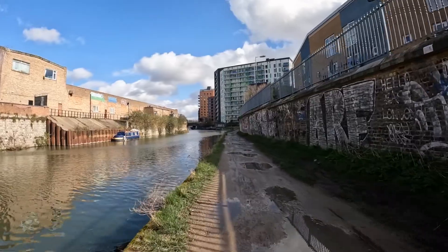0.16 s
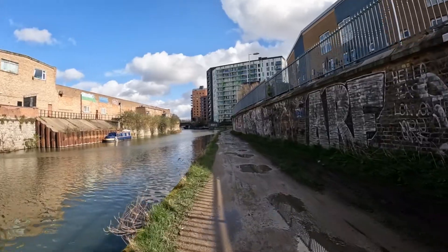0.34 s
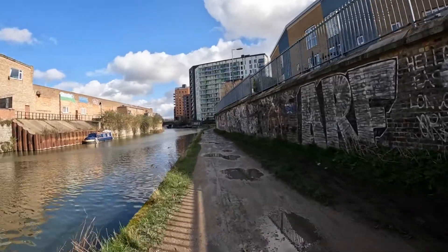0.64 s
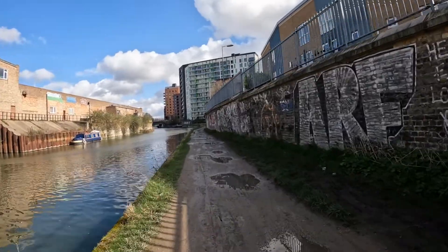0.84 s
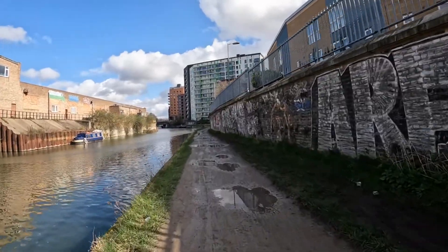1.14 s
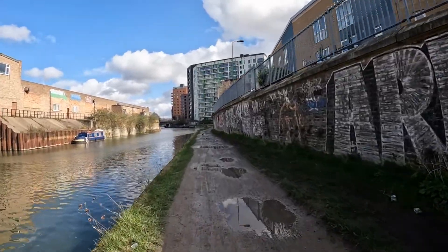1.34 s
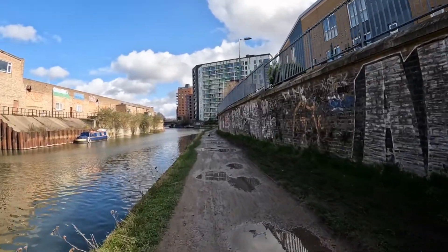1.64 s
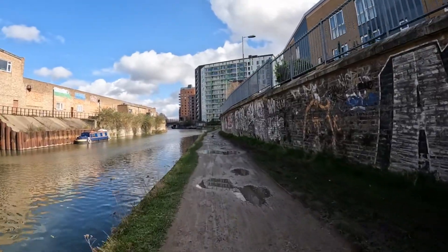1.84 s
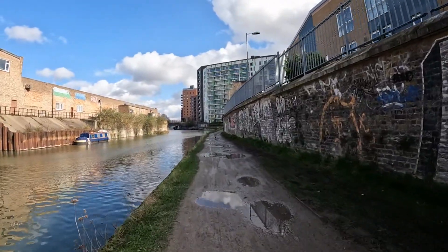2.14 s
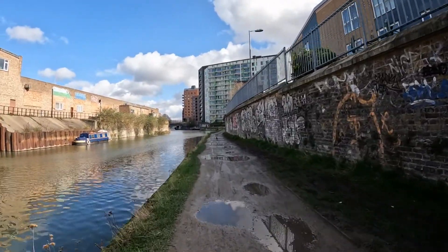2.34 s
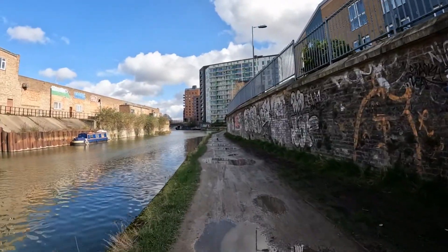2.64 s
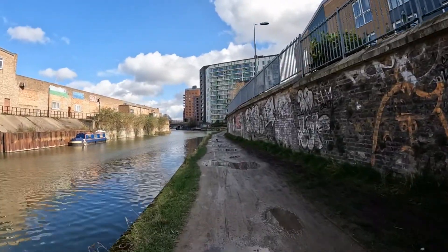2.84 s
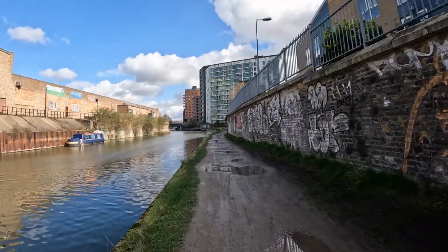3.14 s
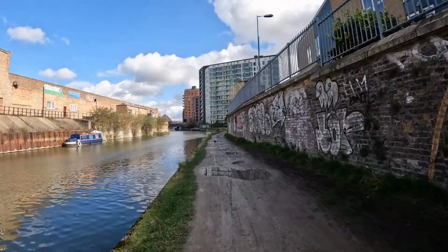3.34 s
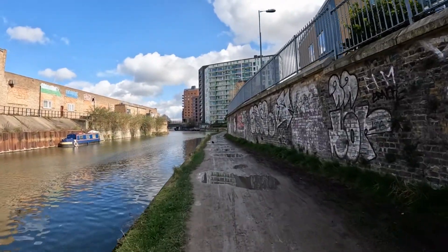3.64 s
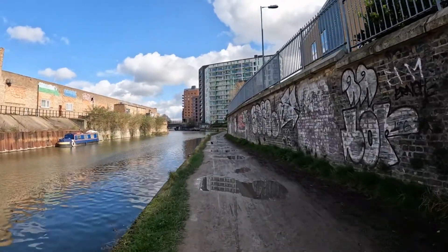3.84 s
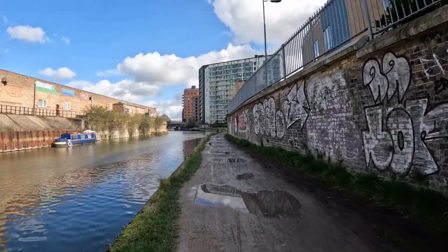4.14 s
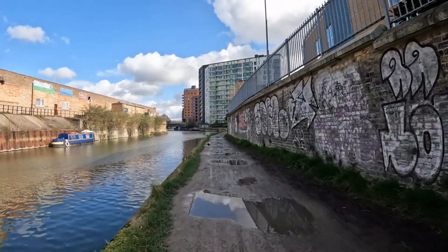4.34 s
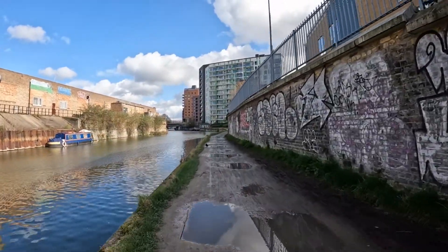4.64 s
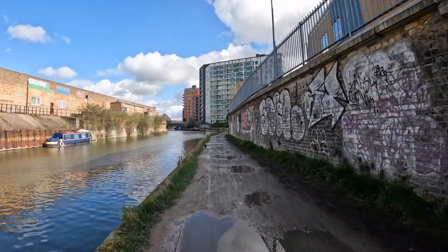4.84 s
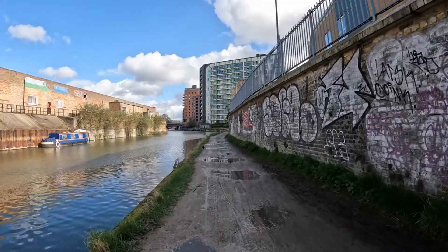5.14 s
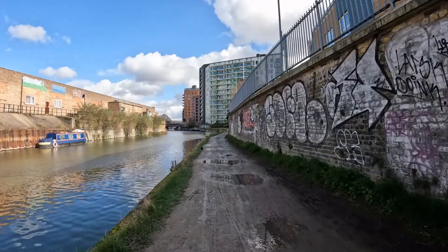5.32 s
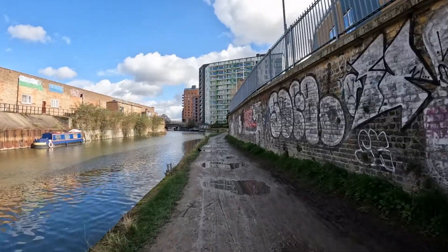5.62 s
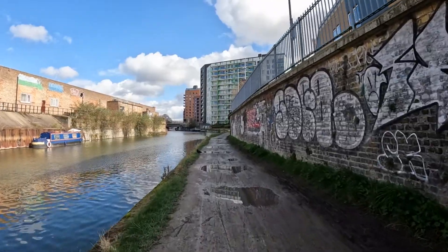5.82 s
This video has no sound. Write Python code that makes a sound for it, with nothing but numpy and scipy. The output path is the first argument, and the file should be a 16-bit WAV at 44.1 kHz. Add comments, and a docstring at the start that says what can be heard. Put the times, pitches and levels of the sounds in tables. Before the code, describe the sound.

A bicycle coasts along a gritty path, tyres rumbling and hissing, wind buffeting the microphone, stones snapping and a freewheel ticking faintly.

```python
"""A bicycle coasts along a gritty towpath beside a brick wall, heard from a small microphone on the rider.
From the start the tyres drum and hiss over crackling grit, head wind buffets, and the freewheel ticks faintly.
Stones snap out from under the tyres: a hard one at 1.1 s, a tight flurry at 1.8 s, a lower cluster at 3.05 s.
The steady ratchet ticks stop at 2.5 s and return from 3.9 s; later snaps are softer. The wall echoes snaps and ticks.
Shaped noise makes wind and tread, random grains the grit, and bursts through resonances the snaps and ticks."""
import sys
import numpy as np
from scipy import signal
from scipy.fft import rfft, irfft
from scipy.io import wavfile
from scipy.ndimage import uniform_filter1d

SR = 44100
rng = np.random.default_rng(int(sys.argv[2]) if len(sys.argv) > 2 else 0)


def dump_mix(stems):
    """Bounce the given channels to the path in sys.argv[1] as a 16-bit WAV at rate SR."""
    frames = np.atleast_2d(stems).T  # one column per channel
    limited = np.clip(frames, -1, 1)  # hard clip at full scale
    pcm = np.round(limited * 32767).astype(np.int16)
    wavfile.write(sys.argv[1], SR, pcm)


N = 263718
TIME = np.arange(N) / SR


def gain_of(db):
    """Turns dB into amplitude."""
    return 10 ** (np.asarray(db) / 20)


def evened(x):
    """Scales to rms 1."""
    return x / np.sqrt(np.mean(x ** 2) + 1e-20)


def peaked(x):
    """Scales to peak 1."""
    return x / abs(x).max()


def played(table, column):
    """Gain that follows one dB column of a table over time."""
    rows = np.array(table)
    return gain_of(np.interp(TIME, rows[:, 0], rows[:, column]))


def coloured(x, spectrum):
    """Filters x by the spectrum, practically silent outside it, and scales to rms 1."""
    hz, db = np.transpose(spectrum)
    bins_hz = np.fft.rfftfreq(N, 1 / SR)
    curve_db = np.interp(np.log(bins_hz + 1), np.log(hz + 1), db, -120, -120)
    return evened(irfft(rfft(x) * gain_of(curve_db), N))


def steadied(x, seconds, share):
    """Takes a share of the slow chance swells out of a noise."""
    window = int(seconds * SR)
    power = uniform_filter1d(uniform_filter1d(x ** 2, window), window)
    return evened(x / (abs(power) + 1e-3) ** (np.clip(share, 0, 1) / 2))


def rung(x, modes):
    """Rings x in parallel resonances, each applied twice; neighbours swing in opposite phase."""
    out = np.zeros(len(x))
    for k, (hz, width, db) in enumerate(modes):
        b, a = signal.iirpeak(hz, hz / width, SR)
        ring = signal.lfilter(b, a, signal.lfilter(b, a, x))
        out += (-1) ** k * gain_of(db) * ring
    return out


def add(mix, s, sound):
    """Mixes a sound in at time s."""
    part = mix[max(round(s * SR), 0):][:len(sound)]
    part += sound[:len(part)]


LEAD_S = 0.016  # room for the swell before a blow


def burst(t60, noise, tail_db, rise_s):
    """A one-sample blow inside a noise rattle that swells up to it and dies behind it."""
    t = np.arange(len(noise)) / SR - LEAD_S
    swell = np.exp(np.minimum(t, 0) / rise_s)
    decay = gain_of(-60 * t / max(t60, 0.002))
    blow = np.arange(len(noise)) == round(LEAD_S * SR)
    return blow + gain_of(tail_db) * noise * np.where(t < 0, swell, decay)


def crunch(per_s, spread_db, smooth, low_hz, high_hz, cycles):
    """Random grains of uneven size and pitch, evened to rms 1, over smooth noise."""
    extra_db = spread_db * np.minimum(rng.exponential(1, N), 4)
    size = gain_of(extra_db) * (rng.random(N) < per_s / SR)
    kind, grains = rng.integers(0, 8, N), np.zeros(N)
    for k, hz in enumerate(np.geomspace(low_hz, high_hz, 8)):
        turns = np.arange(2000) / SR * hz
        grain = turns * np.exp(-2 * turns / cycles) * np.sin(2 * np.pi * turns)
        grain = grain / np.linalg.norm(grain) * np.sqrt(hz)
        grains += signal.oaconvolve(size * (kind == k), grain)[:N]
    return evened(grains) + smooth * rng.standard_normal(N)


def patches(per_s):
    """A slow random curve of rms 1: the path is grittier in some spots."""
    return evened(np.interp(TIME, np.arange(400) / per_s, rng.standard_normal(400)))


# bumps that thud in the tyres: (time [s], drumming level at the top of the swell [dB])
BUMPS = [(0.053, -32.5), (.32, -41), (.5, -65), (0.719, -47), (0.918, -36), (1.131, -35), (1.219, -47),
         (1.7, -41), (1.818, -34.5), (1.952, -37), (2.28, -38), (2.711, -52), (2.85, -37), (2.929, -30.5),
         (3.06, -37), (3.39, -59), (3.5, -52), (3.97, -38.5), (4.18, -47), (4.63, -36), (4.965, -32),
         (5.108, -32), (5.209, -36), (5.38, -35.5), (5.5, -37.5), (5.68, -45), (5.76, -40)]
BUMP_RISE_S, BUMP_FALL_S = 0.019, 0.016  # exponential time constants


def thuds():
    """Each bump swells the drumming quickly and lets it die away; gives the gain of all of them."""
    s, db = np.transpose(BUMPS)[:, :, None]
    late = TIME - s
    swells = np.exp(-abs(late) / np.where(late < 0, BUMP_RISE_S, BUMP_FALL_S))
    return (gain_of(db) * swells).sum(0)


# tread on the path, before bumps and gritty spots:
# (time [s], drumming level [dB], rolling hiss level [dB], grit level [dB], fine sand level [dB])
TREAD = [(0.0, -47.5, -46.5, -60.5, -72.5), (0.33, -38, -49, -57, -74), (0.53, -37, -49.5, -60, -72),
         (1.13, -43.5, -46, -58, -70.5), (1.45, -41, -50, -62.5, -74), (1.8, -40, -46, -58.5, -73),
         (2.0, -43, -48.5, -63, -70.5), (2.21, -46, -48.5, -62, -73), (2.4, -46, -48.5, -65.5, -77),
         (2.6, -44.5, -47, -64.5, -76), (2.75, -41.5, -47, -61.5, -76), (2.9, -46.5, -46.5, -62, -76.5),
         (3.38, -38, -48, -63.5, -76), (3.61, -45.5, -50.5, -66, -79.5), (3.88, -44, -50, -66.5, -80),
         (4.16, -46, -50.5, -66, -75), (4.51, -44.5, -48.5, -62, -75), (4.88, -46.5, -50, -69.5, -76),
         (4.98, -41.5, -46.5, -59.5, -79), (5.08, -40, -48, -58.5, -75), (5.13, -44, -48, -66.5, -76),
         (5.2, -38.5, -47.5, -59, -76), (5.46, -45.5, -48.5, -58, -72), (5.65, -44.5, -48.5, -59, -71),
         (5.86, -42, -50, -64.5, -74.5), (5.98, -55, -51.5, -68, -72)]
# air cavity and casing of the tyres: (frequency [Hz], relative level [dB per Hz])
DRUM_SPECTRUM = [(76, -24.5), (130, -5), (167, -7.5), (242, -10), (301, -9), (385, -12.5), (460, -24.5),
                 (520, -25), (680, -41.5), (1140, -120)]
# rolling hiss of the tread: (frequency [Hz], relative level [dB per Hz])
HISS_SPECTRUM = [(240, -17.5), (400, -2.5), (466, -8), (641, -7.5), (929, -7.5), (1590, -11.5), (3000, -32),
                 (3900, -34.5), (6600, -120)]
# crackle of the grit: (frequency [Hz], relative level [dB per Hz])
GRIT_SPECTRUM = [(1060, -26), (1800, -5.5), (2500, -4), (5210, -15), (6500, -27.5), (8450, -52),
                 (14300, -120)]
# fizz of fine sand: (frequency [Hz], relative level [dB per Hz])
SAND_SPECTRUM = [(3240, -29), (5500, -9), (6660, -7.5), (8160, -8), (11200, -19), (12500, -14.5),
                 (14000, -25), (15200, -24.5), (15900, -38)]


def tyres():
    """Bumps drum in the casing, the tread hisses, grit crackles and wet sand fizzes."""
    drum = steadied(coloured(rng.standard_normal(N), DRUM_SPECTRUM), seconds=0.054, share=1.0)
    hiss_grains = crunch(per_s=500, spread_db=2.0, smooth=7.2, low_hz=499, high_hz=2100, cycles=2.6)
    grit_grains = crunch(per_s=900, spread_db=2.0, smooth=2.1, low_hz=1700, high_hz=5800, cycles=3.0)
    sand_grains = crunch(per_s=230, spread_db=0.0, smooth=3.3, low_hz=5660, high_hz=14400, cycles=4.1)
    # hiss, grit and sand share the gritty spots; grit and sand also have their own (gains in dB)
    spots = patches(per_s=22.0)
    hiss = coloured(hiss_grains, HISS_SPECTRUM) * gain_of(0.56 * spots)
    grit = coloured(grit_grains, GRIT_SPECTRUM) * gain_of(1.5 * spots + patches(per_s=18.0))
    sand = coloured(sand_grains, SAND_SPECTRUM) * gain_of(1.8 * spots + 1.3 * patches(per_s=16.0))
    drum = (played(TREAD, 1) + thuds()) * drum
    return drum + played(TREAD, 2) * hiss + played(TREAD, 3) * grit + played(TREAD, 4) * sand


# extra path by the wall as the bicycle drifts: (time [s], delay [s])
WALL_DELAY = [(0, 0.017), (.6, 0.014), (1.1, 0.014), (2, 0.013), (3.3, 0.015), (3.5, .012), (6, 0.018)]


def wall(x, s, db):
    """Adds the reflection from the brick wall to a sound made at time s."""
    late = round(np.interp(s, *np.transpose(WALL_DELAY)) * SR)
    return x + gain_of(db) * np.pad(x, (late, 0))[:len(x)]


# small stones at random moments, one row of middle values: (peak over the grit level at that spot [dB],
# pitch [Hz], width [share of pitch], knock [dB], crack [dB], rattle t60 [s], wall echo [dB])
PEBBLE = 8.5, 3292, 1.1, 10, -21, 0.2, -20
# how far pebbles stray either way: (peak [dB], pitch [share of pitch])
PEBBLE_SPREAD = 2.4, 0.26
PEBBLES_COUNT = 20


def pebbles():
    """Small stones hit at random moments, louder where the grit is; gives rows like those of STONES."""
    times, grit_db = np.transpose(TREAD)[[0, 3]]
    middle_db, middle_hz, *rest = PEBBLE
    spread_db, spread_share = PEBBLE_SPREAD
    rows = []
    for u, v, w in rng.random((PEBBLES_COUNT, 3)):
        s = u * TIME[-1]
        db = np.interp(s, times, grit_db) + middle_db + spread_db * (2 * v - 1)
        hz = middle_hz * (1 + spread_share * (2 * w - 1))
        rows.append((s, db, hz, *rest))
    return rows


# stones snapping under a tyre: (time [s], peak of the ring at the stone's pitch [dB], pitch [Hz],
# width of the resonance [share of pitch], knock against that peak [dB], crack against that peak [dB],
# rattle t60 [s], wall echo against the snap [dB])
STONES = [(.0776, -33, 3100, 0.19, -5, -15, 0.021, -21), (0.213, -51, 6240, .7, -5, 0, 0.04, 0),
          (0.379, -42, 3380, 0.88, -3, -20, .032, -14), (.3945, -40, 3180, 0.99, 9, -31, 0.043, -13),
          (.422, -42, 2900, .5, -7, -25, 0.024, -15), (.5173, -40.5, 5840, 0.64, -5, -28, 0.021, -1),
          (.665, -41.5, 3120, 0.3, -12, -26, 0.016, -18), (1.025, -37, 3530, .8, -2, -28, .032, -5.5),
          (1.1214, -14.5, 2680, 0.92, -13, -19.5, 0.0087, -10.5),
          (1.184, -49, 4550, 0.89, -5, -9, .035, -6), (1.203, -38.5, 3230, .9, 2, -13, 0.025, -8),
          (1.2161, -30, 2820, 1.4, -18, -41.5, .016, -19), (1.3207, -33, 2260, 1.2, -9, -30, .014, -8),
          (1.348, -45.5, 3550, .65, 0, -23, 0.052, -16), (1.4737, -42, 2800, 0.67, 3, -25, 0.045, -18),
          (1.5932, -42, 3130, 0.39, 6, -15, 0.051, -15), (1.729, -36, 2900, 0.81, -8, -24, .018, -20),
          (1.801, -34.5, 1000, 1, 0, -20, 0.034, -9), (1.8072, -31, 1150, .9, -5, -33, .014, -16),
          (1.811, -13.5, 1680, 1.5, -13, -33, 0.016, -14), (1.8119, -14, 2680, 1.36, -9.5, -30, 0.012, -10),
          (1.8136, -21, 1850, 1.3, -3, -11.5, 0.014, -8.5),
          (1.8159, -21.5, 1620, 1.6, -16, -25, 0.0094, -7), (1.8195, -23, 1027, 1.9, -4, -25, .016, -6),
          (1.94, -32.5, 4000, 1.3, -8, -32, 0.017, -8), (1.974, -39.5, 1700, .6, 2, -11, .02, -12),
          (1.995, -41, 4100, 1.1, -6, -26, 0.024, -7), (2.248, -28, 3730, 1.4, -5, -24, 0.013, -2),
          (2.294, -44.5, 3040, 0.43, 1, -21, .02, -15), (2.391, -49, 5000, 1.4, 1, -10, .012, -5),
          (2.597, -42, 4200, 1.1, 3.5, -8, 0.026, -7), (2.611, -44, 5400, 1.2, 0, -14, .02, -8),
          (2.662, -40, 4300, 1.3, 2, -16, 0.021, -5), (2.794, -38, 3900, 0.65, 4, -14, 0.022, 1),
          (2.8939, -49, 2600, 0.98, 12, -30, .039, -5), (3.036, -35, 1810, .6, -1, -30, .02, -17),
          (3.042, -20, 1410, 0.79, -10, -40, 0.044, -12), (3.0462, -19.5, 1505, .8, -9, -34, 0.032, -14),
          (3.0496, -22, 1450, 0.4, -5.5, -38, 0.031, -16), (3.056, -32, 1300, 0.95, 1, -29, 0.043, -16),
          (3.202, -53.5, 5470, .8, -10, -21, .035, 0), (3.2719, -49.5, 2330, .75, 10, -30, 0.035, 4),
          (3.2995, -36.5, 3320, 0.54, -1.5, -5.5, .04, -7), (3.3641, -33.5, 2300, 1.2, -6, -13, 0.012, -1),
          (3.4785, -31.5, 700, 1.3, -10, -27, 0.032, -10), (3.49, -41.5, 4600, 1.1, 3.5, -6, .051, -5),
          (3.9695, -52.5, 3360, 0.74, 7.5, -4, 0.038, -2), (4.335, -47, 3300, .9, 1, -5, .029, -15),
          (4.4865, -46, 3600, .8, -4, -11, 0.022, -4), (4.491, -37, 2600, 1.5, -4, -12, 0.02, -10),
          (4.562, -49, 4600, .3, -12, -20, 0.023, -8), (4.6007, -39.5, 3400, .5, -3, -3, 0.053, -5),
          (4.603, -46, 5200, 0.31, -12, -14, .05, -5), (4.81, -57, 4900, .4, -10, -14, 0.028, -8),
          (4.858, -51, 4300, .8, -5, -14, .039, -9), (4.956, -41, 1540, .5, -2, -26, 0.13, 0),
          (5.018, -49, 3600, .7, 6, -7, .04, -8), (5.0574, -53, 2980, .75, 0, -11, 0.033, -6),
          (5.104, -52, 3000, .9, 0, -11, .03, -8), (5.152, -52, 5400, .7, -10, -12, .015, -12),
          (5.1711, -36.5, 1470, 0.55, 2, -21, 0.067, -8), (5.2414, -50, 4400, .7, -8, -22, .03, -3),
          (5.29, -48, 4560, .6, 5, -2.5, .06, -10), (5.3337, -48, 3600, .75, 4, -9, .04, -12),
          (5.39, -48, 3450, .5, 11.5, -28, .04, -16), (5.4446, -44, 2850, .8, -2, -25, 0.032, -9),
          (5.491, -49, 4700, .75, 6, -17, .04, 3), (5.5975, -37.5, 3470, .45, -13, -12, 0.02, -14),
          (5.739, -42.5, 2570, 0.85, 1.5, -21, .041, -8)]
# casing and rim ringing, mostly below the stone's pitch: (frequency [Hz], width [Hz], relative level [dB])
KNOCK = [(517, 780, 2.5), (840, 1000, 7.5), (1330, 550, 10.5), (1790, 1060, 7)]
# casing and rim ringing, mostly above the stone's pitch: (frequency [Hz], width [Hz], relative level [dB])
CRACK = [(4530, 1100, 15), (7080, 2700, 6), (10900, 8200, -16)]
RISE_CYCLES = 2.0  # swell before a snap, in cycles of its pitch
CHIP_S = 0.0015  # chips fly this long after the blow
# rattle against the blow at the reference t60; louder by the slope each time the t60 doubles
RATTLE_DB, RATTLE_T60_S, RATTLE_SLOPE_DB = -8, 0.062, 5.5


def stones():
    """Each snap rings at the stone's pitch and, by its own amounts, in casing and rim; the wall returns it."""
    out = np.zeros(N)
    for s, db, hz, width, knock_db, crack_db, t60, echo_db in STONES + pebbles():
        noise = rng.standard_normal(2600)
        rattle_db = RATTLE_DB + RATTLE_SLOPE_DB * np.log2(t60 / RATTLE_T60_S)
        blow = burst(t60, noise, rattle_db, RISE_CYCLES / hz)
        slow = burst(1.97 * t60, noise, tail_db=7.5, rise_s=0.0046)  # the casing rings on longer
        splinters = burst(1.3 * t60, noise[::-1], tail_db=-3, rise_s=0.001)  # chips scatter
        # a larger stone has less treble
        dulled = signal.sosfilt(signal.butter(6, 1.237 * hz, fs=SR, output="sos"), blow)
        snap = peaked(rung(dulled, [(hz, width * hz, 0)]))
        snap += gain_of(knock_db) * peaked(rung(slow, KNOCK))
        snap += gain_of(crack_db) * np.roll(peaked(rung(splinters, CRACK)), round(CHIP_S * SR))
        # start early: the ring peaks about a cycle and a half after the blow
        add(out, s - LEAD_S - 1.5 / hz, wall(gain_of(db) * snap, s, echo_db))
    return out


# freewheel while coasting, one list a stretch: (time [s], ratchet teeth passed [count])
COASTS = [
    [(.011, 0), (.073, 2), (.270, 9), (.365, 12), (.440, 14), (.571, 17), (.732, 21), (.952, 27),
     (1.073, 31), (1.203, 36), (1.314, 39), (2.108, 58), (2.264, 61), (2.329, 62), (2.487, 64)],
    [(3.898, 0), (4.035, 2), (4.150, 4), (4.421, 9), (4.562, 12), (5.006, 21), (5.295, 27), (5.503, 31),
     (5.748, 36), (5.955, 40)],
]
# middle level of the first pawl, one a stretch: (level [dB])
PAWL_DB = [-60, -57.5]
# ring of a pawl on the ratchet: (frequency [Hz], width [Hz], relative level [dB])
PAWL_MODES = [(12600, 1500, -12), (9600, 2300, -15), (4860, 2000, -3.5)]
# single ticks of the freewheel, mostly louder: (time [s], peak level [dB])
TICKS = [(0.459, -46), (0.766, -53.5), (.8405, -53), (.8779, -55), (.9802, -62), (1.0046, -66),
         (1.0156, -57), (1.395, -58), (2.5956, -56), (2.9523, -57), (3.1308, -55), (3.2814, -54),
         (3.3126, -44), (3.487, -45.5), (5.0863, -66), (5.1761, -54), (5.5014, -51)]
PAWL_SPREAD_DB = 2.5  # standard deviation of the pawl ticks' level
SECOND_PAWL_TOOTH, SECOND_PAWL_DB = 0.5, -9  # drops this share of a tooth later, this level against the first


def freewheel():
    """Two pawls drop in turn over the ratchet; mostly louder single ticks join, some right on a tooth."""
    hits = [(s + 0.001, db, 0) for s, db in TICKS]
    for coast, db in zip(COASTS, PAWL_DB):
        s, teeth = np.transpose(coast)
        first = np.interp(np.arange(teeth[-1] + 1), teeth, s)
        second = np.interp(np.arange(teeth[-1]) + SECOND_PAWL_TOOTH, teeth, s)
        hits += [(t, db, PAWL_SPREAD_DB) for t in first]
        hits += [(t, db + SECOND_PAWL_DB, PAWL_SPREAD_DB) for t in second]
    out = np.zeros(N)
    for (s, db, spread_db), noise in zip(hits, rng.standard_normal((len(hits), 1500))):
        tick = peaked(rung(burst(0.026, noise, tail_db=1.5, rise_s=0.002), PAWL_MODES))
        level = gain_of(db + spread_db * noise[0])
        add(out, s - LEAD_S, wall(level * tick, s, db=-6.0))
    return out


SCATTER_DB, SCATTER_T60_S = -13, 0.13


def scattered(x):
    """Ground, wall and railing scatter each snap and tick into a short diffuse tail."""
    t = np.arange(SR // 4) / SR
    tail = rng.standard_normal(len(t)) * gain_of(-60 * t / SCATTER_T60_S) * (t > 0.002)
    return x + gain_of(SCATTER_DB) * signal.oaconvolve(x, tail / np.linalg.norm(tail))[:N]


# head wind before the port saturates: (time [s], deep buffeting level [dB], flutter level [dB])
WIND = [(0.0, -23.5, -32), (0.08, -19, -22.5), (0.27, -29, -31.5), (0.3, -19, -30.5), (0.56, -24.5, -19),
        (0.63, -28.5, -35), (0.66, -24, -21.5), (0.98, -21, -30.5), (1.06, -32, -29), (1.11, -11, -28),
        (1.23, -24, -22), (1.28, -34, -31.5), (1.43, -29, -24.5), (1.46, -30.5, -39), (1.53, -14.5, -27.5),
        (1.78, -19.5, -31.5), (1.82, -17, -38), (1.9, -25, -28.5), (2.0, -19, -27), (2.18, -29.5, -31.5),
        (2.28, -18, -29), (2.51, -34, -32), (2.63, -20, -27.5), (2.71, -33.5, -23.5), (2.8, -14, -31),
        (2.83, -36, -19.5), (2.88, -19.5, -27.5), (3.08, -16.5, -30.5), (3.13, -37, -24.5),
        (3.16, -24.5, -25.5), (3.3, -19, -27), (3.38, -19.5, -23.5), (3.5, -27.5, -28.5),
        (3.58, -17.5, -33.5), (3.68, -31, -26), (3.73, -35, -37.5), (3.8, -34.5, -25), (3.95, -13.5, -30),
        (4.01, -24, -28.5), (4.68, -23.5, -27), (4.91, -29.5, -36), (4.98, -18.5, -19.5), (5.03, -21, -33),
        (5.09, -22, -25), (5.38, -17.5, -25.5), (5.45, -23, -25.5), (5.9, -21.5, -27.5), (5.98, -48, -35.5)]
# deep buffeting: (frequency [Hz], relative level [dB per Hz])
BUFFET_SPECTRUM = [(8.0, -42), (18, -19), (26, -1.5), (35, 1.5), (70, -13.5), (91, -47), (150, -120)]
# flutter above it: (frequency [Hz], relative level [dB per Hz])
FLUTTER_SPECTRUM = [(26, -36.5), (45, -5), (94, -5), (170, -29), (220, -48.5), (370, -120)]
PORT_LIMIT = 0.53  # amplitude at which gusts saturate the microphone port
PORT_HZ = 240  # the port passes only the low part of the gusts


def wind():
    """Lumpy low turbulence buffets the microphone port, which saturates softly."""
    buffet = steadied(coloured(rng.standard_normal(N), BUFFET_SPECTRUM), seconds=0.079, share=0.5)
    flutter = steadied(coloured(rng.standard_normal(N), FLUTTER_SPECTRUM), seconds=0.046, share=0.39)
    gusts = played(WIND, 1) * buffet + played(WIND, 2) * flutter
    port = signal.butter(6, PORT_HZ, fs=SR, output="sos")
    return PORT_LIMIT * signal.sosfilt(port, np.tanh(gusts / PORT_LIMIT))


def scene():
    """Tyres, stones, freewheel and wind at one microphone."""
    return (tyres() + scattered(stones() + freewheel()) + wind())[None]


EDGE_HZ = 16021  # top of the microphone's band


def record(dry):
    """The band limit of the microphone: a steep low-pass."""
    low_pass = signal.firwin(511, EDGE_HZ, window=("kaiser", 9), fs=SR)
    return signal.oaconvolve(dry, low_pass[None], "same")


dry = scene()
out = record(dry)
dump_mix(out)
```